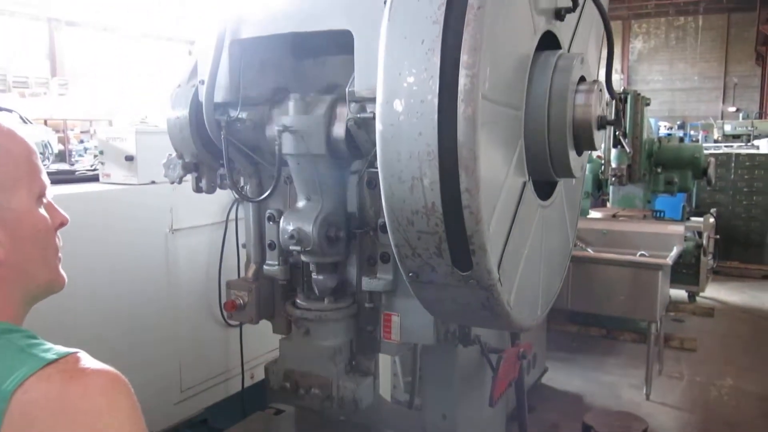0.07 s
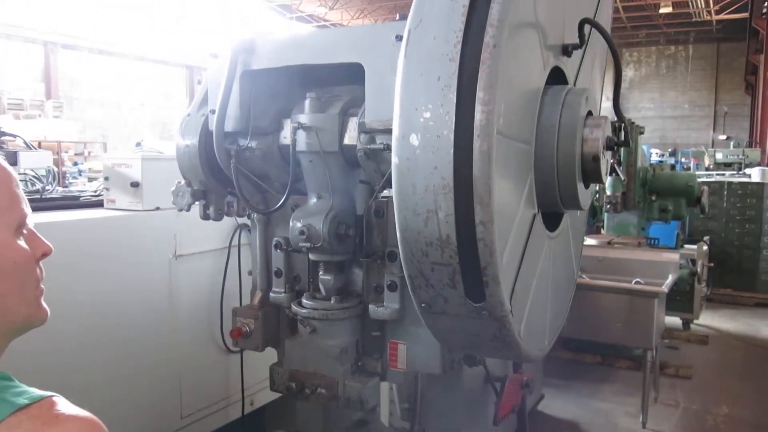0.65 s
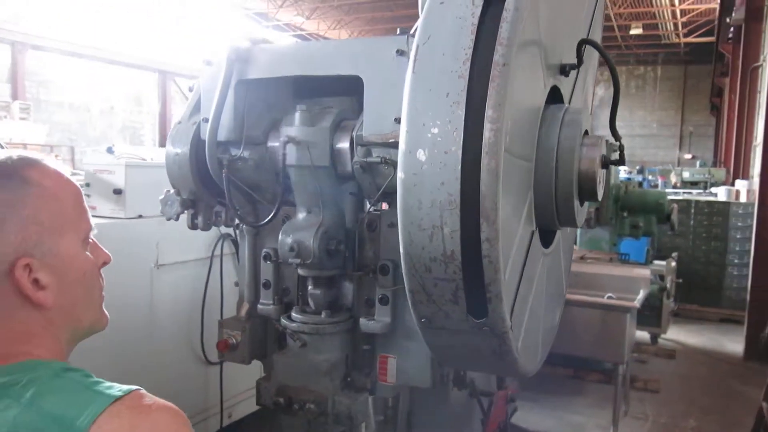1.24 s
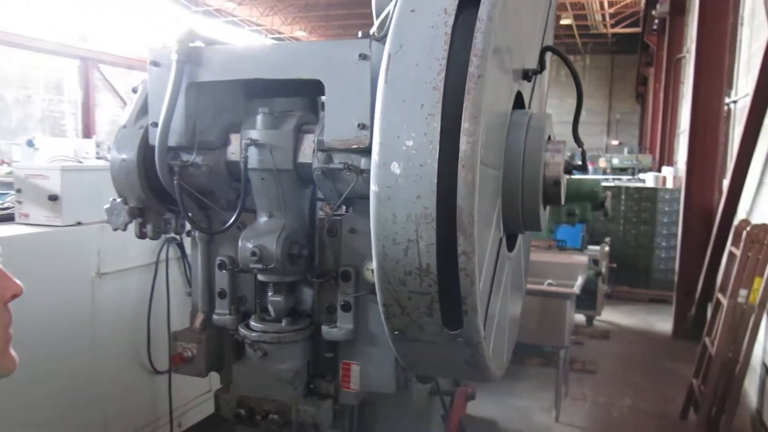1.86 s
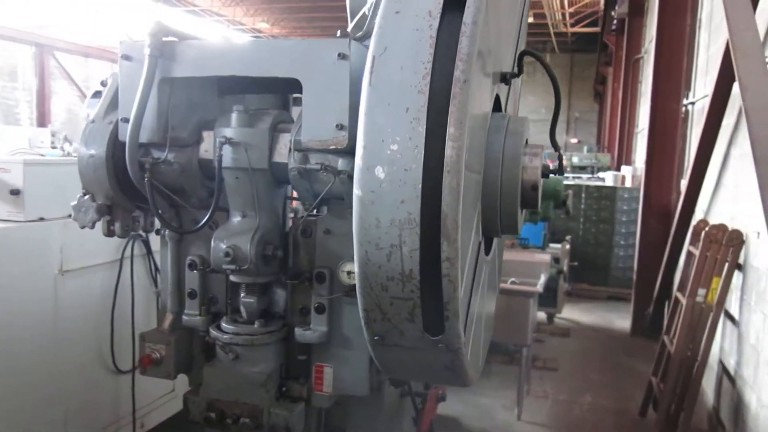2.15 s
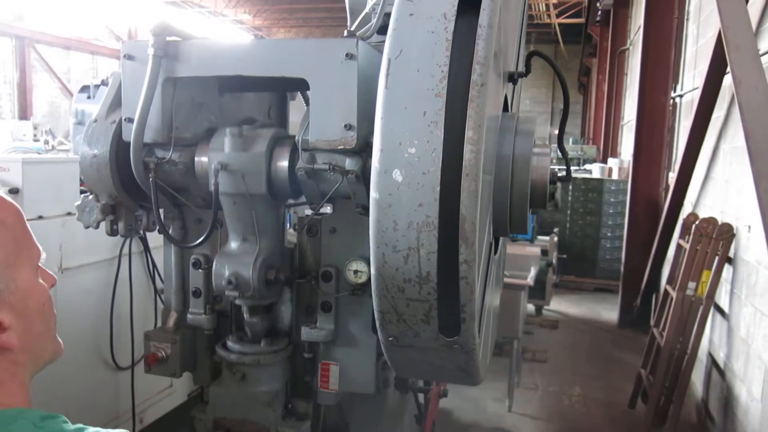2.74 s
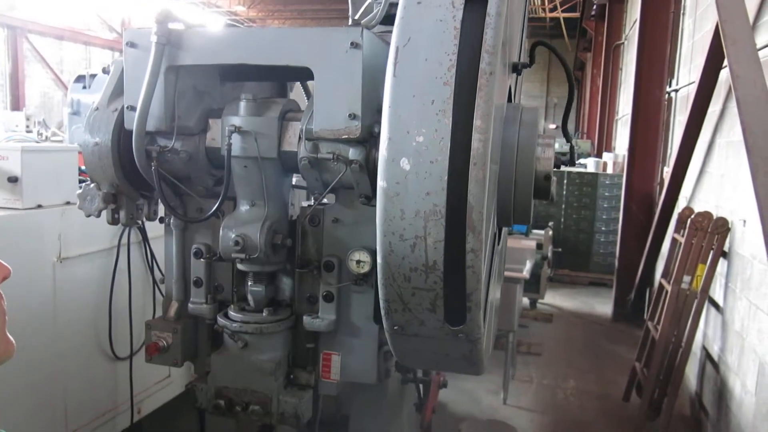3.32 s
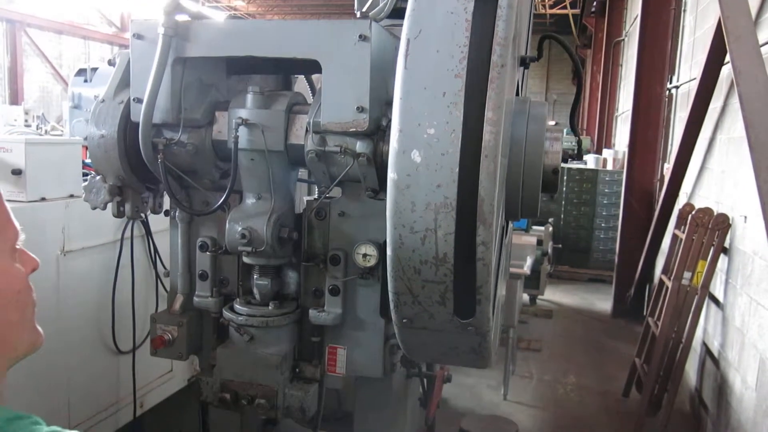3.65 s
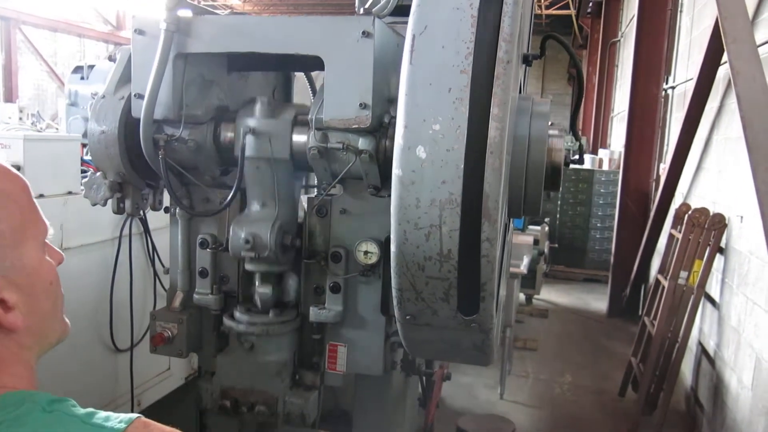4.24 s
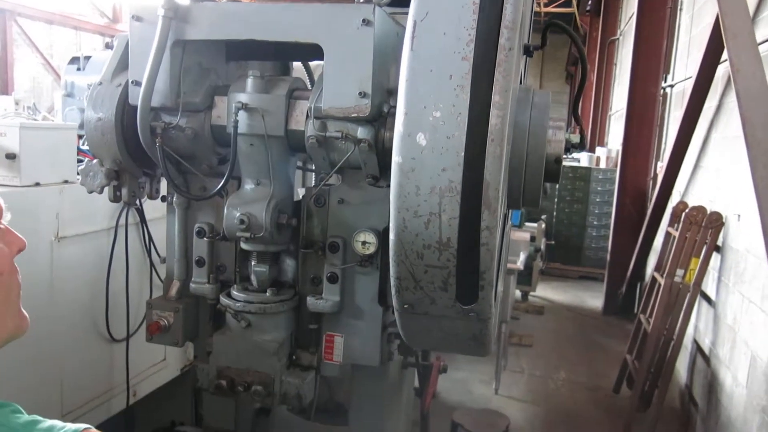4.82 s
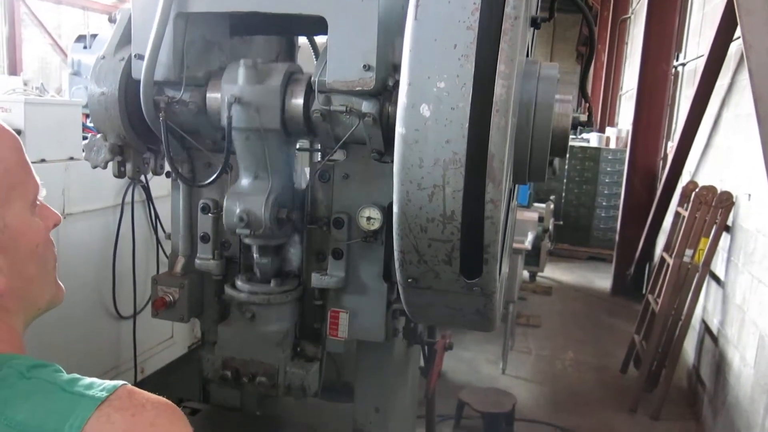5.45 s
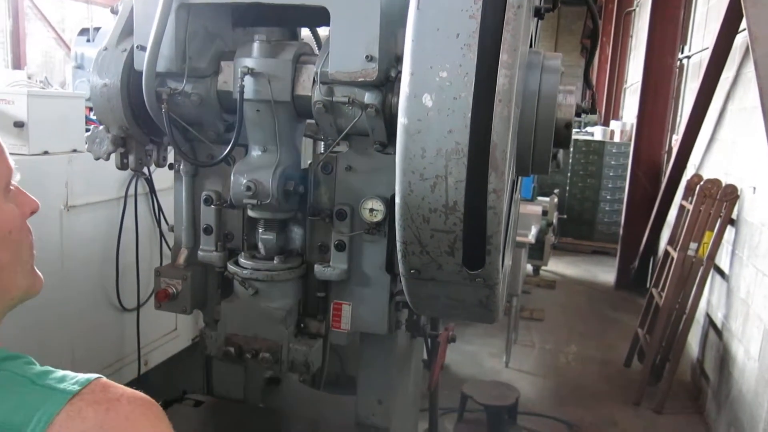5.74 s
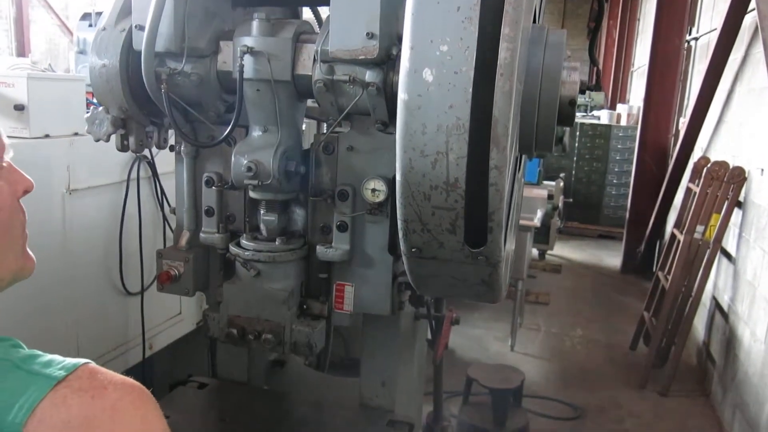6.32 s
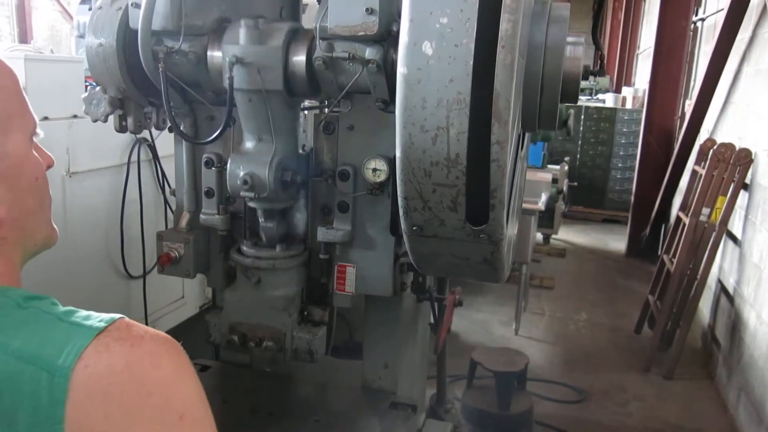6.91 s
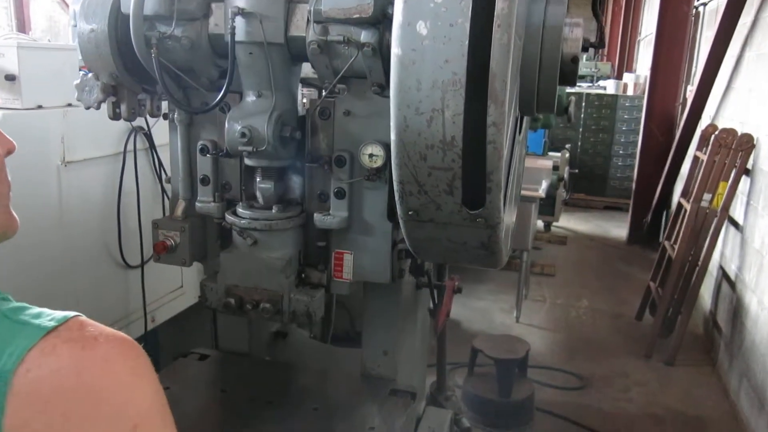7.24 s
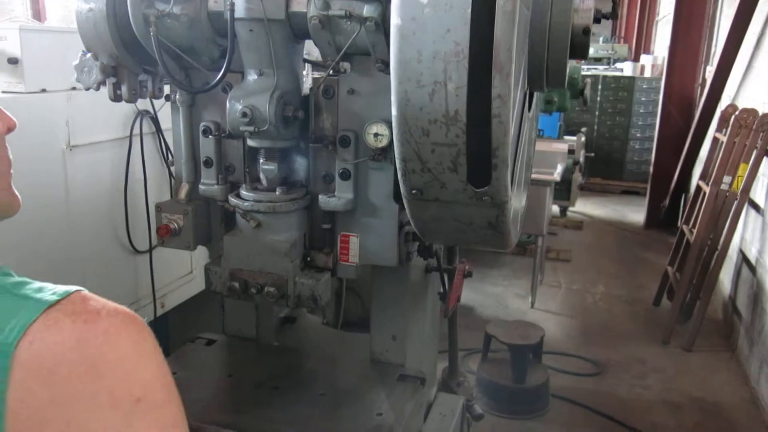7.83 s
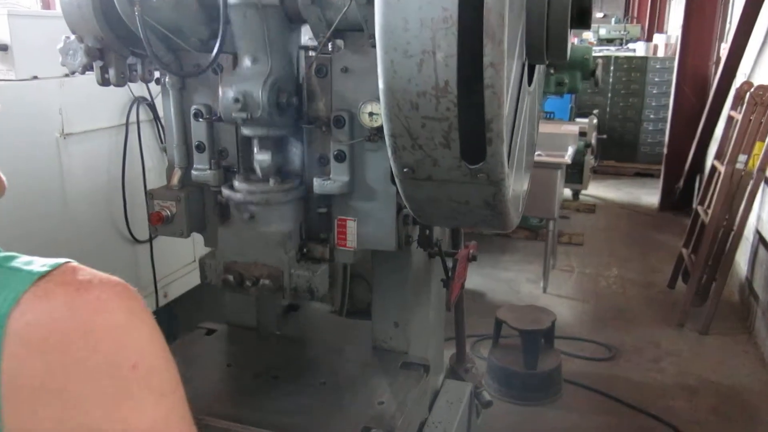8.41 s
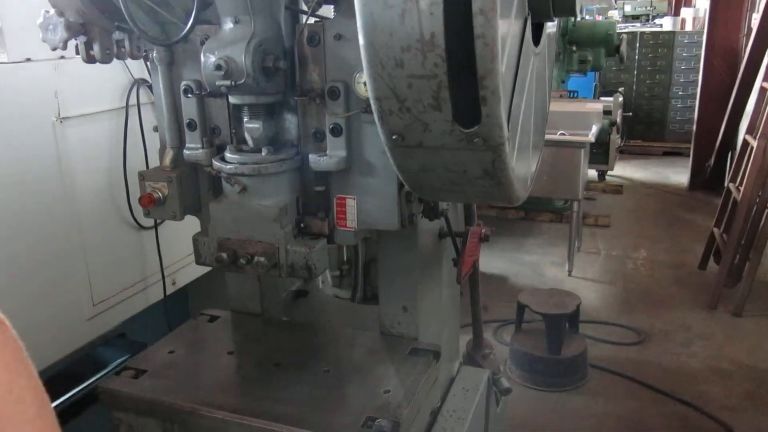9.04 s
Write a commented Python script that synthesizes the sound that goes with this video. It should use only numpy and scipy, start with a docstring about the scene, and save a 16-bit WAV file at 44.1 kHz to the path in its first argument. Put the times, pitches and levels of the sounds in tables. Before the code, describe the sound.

In a large, echoing workshop, a nearby punch press is tripped by its pedal over and over at a steady pace. Every stroke slams through the heavy metal frame, snaps sharply and ends in a ringing steel clank, seven in all. The pedal linkage clicks and clinks lightly between them, while the motor and flywheel keep up a soft, even hum.

```python
"""Heavy steel slams, clacks and clinks ring through a large workshop over a motor's hum.
A flywheel punch press is tripped by its pedal, one stroke at a time: the trip rod clicks, the clutch
slams in and shakes the cast frame, the latch snaps back, the clutch is knocked out in three quick
blows, and the pedal returns. Struck parts ring as decaying noise bands (crowded resonances)
and damped sines (single modes)."""
import sys
import numpy as np
from scipy import signal
from scipy.fft import rfft, irfft
from scipy.io import wavfile

SR = 44100
rng = np.random.default_rng(int(sys.argv[2]) if len(sys.argv) > 2 else 0)


def waveform_to_disk(signal):
    """Save audio, clipped to [-1, 1], as 16-bit WAV at the path in sys.argv[1]."""
    frames = np.transpose(np.atleast_2d(signal))
    scaled = np.clip(frames, -1, 1) * 32767
    samples = np.round(scaled).astype(np.int16)
    wavfile.write(sys.argv[1], SR, samples)


N = 399987
T = np.arange(N) / SR
RING_SAMPLES = 24576
BANDS_HZ = np.geomspace(50, 16000, num=16)
SNAP_AFTER_S, STOP_AFTER_S = .1515, .3826  # from the slam; same crank speed every stroke

# clutch engagements, one per stroke: start_s, level_db, boom_db, pin_slide_s, pin_sing_db
STROKES = [(-.106, 5, -0.5, .0255, -1), (1.2130, -0.5, -3.5, 0.024, -6), (2.6250, 0.5, 0, 0.026, -8),
           (3.9434, -1.5, 1, 0.024, -5.5), (5.3558, 0, -2, .026, -7), (6.768, 0, -1.5, 0.025, 0.5),
           (8.0864, -1, -2, .019, 4)]
# foot presses or leaves the pedal: start_s, level_db
TREADS = [(2.275, -13.5), (3.305, 6), (3.917, -1.5), (5.244, 1), (6.697, 6.5), (8.047, 3)]
# trip rod pulls the latch: start_s, click_db, ping_db
TRIPS = [(1.198, -9.5, -29.5), (2.566, 6, -6), (3.913, -14, -33), (5.2904, 4.5, 0), (6.7235, -0.5, -3.5),
         (8.076, -17, -29)]
# pedal let go, linkage springs back: start_s
RELEASES_S = [1.666, 3.2433, 4.4538, 5.8954, 7.2884, 8.6787]

# crowded resonances, cast frame: freq_hz, density_db, t60_s
FRAME_BODY = [(35, -18, 0.84), (80, -10, 0.52), (172, 0, 0.59), (320, -0.5, 0.61), (480, -3, 0.58),
              (650, 0.5, 0.26), (1280, -2, 0.39), (2610, -5.5, 0.17), (3140, -12, 0.33), (5000, -9.5, 0.11),
              (8950, -19.5, 0.19), (15360, -27, .11)]
# latch: freq_hz, density_db, t60_s
LATCH_BODY = [(100, -15.5, .2), (500, -2, 0.82), (1420, 3.5, 0.2), (2820, 6.5, 0.13), (2890, -3, 0.35),
              (4750, 6.5, 0.12), (5750, 0.5, 0.025), (9150, 3.5, 0.21), (11320, -1, 0.1),
              (14600, -1.5, .075), (15800, -1, .07)]
# clutch pin: freq_hz, density_db, t60_s
PIN_BODY = [(80.5, -3.5, 0.46), (300, -4.5, 0.27), (700, -1, 0.36), (2160, 1.5, 0.29), (3300, -5, 0.11),
            (4600, -1.5, 0.096), (8000, -9.5, .11), (15500, -12.5, 0.099)]
# pin stop: freq_hz, density_db, t60_s
STOP_BODY = [(80, -26, 0.27), (304, 5.5, 0.28), (650, 3.5, 0.24), (2150, 2, 0.13), (3180, -4.5, 0.19),
             (4700, -1, 0.15), (6200, -3.5, 0.14), (12300, -6.5, 0.15), (15500, -17, .09)]
# trip rod: freq_hz, density_db, t60_s
ROD_BODY = [(150, -16, 0.39), (500, -2.5, 0.23), (1500, -15, 0.22), (2110, -2, 0.077), (3060, -13.5, 0.11),
            (5100, -6, 0.1), (6800, -15, .08), (9000, -14, 0.12), (15500, -26, 0.068)]
# pedal linkage: freq_hz, density_db, t60_s
LINKAGE_BODY = [(150, -11, 0.2), (1400, 0.5, 0.2), (3370, -4.5, 0.16), (4240, 4, 0.2), (6650, -6.5, .13),
                (10000, -2.5, 0.23), (12600, -11.5, 0.16), (13800, 1, .12), (15800, -2, 0.067)]
# pedal: freq_hz, density_db, t60_s
PEDAL_BODY = [(80, -23, 0.28), (174, 7, 0.44), (450, 0.5, 0.13), (1000, 2, 0.2), (2020, -28, 0.28),
              (12000, -50, .1)]

# single modes, cast frame: pitch_hz, level_db, t60_s
FRAME_MODES = [(78.8, -26, 0.36), (103.6, -29.5, 1), (123.4, -26.5, 0.65), (150, -27, 1), (167, -21.5, 1),
               (237.6, -17, 0.17), (275, -16.5, 0.29), (320, -13.5, 0.68), (394.9, -16.5, 0.41),
               (602, -15.5, 0.58), (648, -9.5, 0.21), (723, -12, 0.13), (793, -19.5, 0.35),
               (1110, -31.5, 0.19), (1530, -19, 0.84), (3440, -35.5, .2), (3747, -28.5, .2),
               (4650, -21, .22), (7500, -15.5, 0.21), (9030, -24, .2), (10460, -22, 0.22)]
# downstroke squeak: pitch_hz, level_db, t60_s
SQUEAK_MODES = [(2600, -3, 0.074), (2766, -16, .08), (5200, -7, 0.043), (8240, -11.5, 0.045)]
# latch: pitch_hz, level_db, t60_s
LATCH_MODES = [(2420, -27, .2), (2690, -25, 0.31), (3700, -22.5, 0.2), (4820, -20.5, 0.24),
               (8920, -13, 0.075), (9100, -17, .07), (9970, -13, 0.081), (14000, -17, .07)]
# clutch pin: pitch_hz, level_db, t60_s
PIN_MODES = [(1550, 3.5, 0.86), (4760, -24, 1.1), (4900, -23, 0.83), (7490, -15, .9), (7150, -17, 1.4)]
# pin stop: pitch_hz, level_db, t60_s
STOP_MODES = [(675, -28, 0.25), (3220, -32, .12), (4620, -17, .12), (7510, -8.5, 0.062), (9300, -26, 0.12),
              (9630, -19, 0.078), (10350, -21, .065), (11900, -22, 0.081), (13800, -18.5, .07),
              (15229, -24, .11)]
# trip rod: pitch_hz, level_db, t60_s
ROD_MODES = [(175, -29, .4), (1918, -11, 0.046), (2110, -3.5, 0.035), (3795, -28.5, .16), (3870, -19, 0.21),
             (4900, -15.5, 0.12), (6110, -15, 0.044), (7440, -24, .09), (7600, -1, 0.054)]
# pedal linkage: pitch_hz, level_db, t60_s
LINKAGE_MODES = [(1490, -25, 0.99), (4350, -29, 0.11), (4840, -19, .4), (7530, -13, 0.33), (9200, 1, 0.074),
                 (14034, -22, .04), (14497, -15, .04)]

# hall reverberation: freq_hz, density_db, t60_s
HALL_DECAY = [(60, 3.5, 0.98), (170, 1, 2.25), (400, -2.5, 1.46), (1020, -1.5, 2.38), (1800, -0.5, 1.86),
              (3200, -3.5, 1.96), (4950, -0.5, 1.41), (8800, 0.5, 0.72), (15140, 7, 0.36)]
# fan, belt and flywheel noise: freq_hz, density_db
WHIRR_SPECTRUM = [(15, -50), (25, -5.5), (92, -16), (114, -3.5), (249, -14.5), (285, -2.5), (317, -13),
                  (394, -3.5), (476, -9), (531, -4), (840, -14), (1740, -12), (2220, -19), (16000, -40.5)]
# motor and bearing tones: pitch_hz, level_db
HUM_TONES = [(120, -68), (280, -71), (401, -68), (543.5, -61), (592, -71.5), (635, -66), (1045, -66)]


def clutch():
    """The pin slams into the flywheel, rebounds twice in its pocket and squeaks as the ram descends."""
    blows = pick(STROKES, column=1)
    slam = strike(blows, FRAME_BODY, db=-12.5, side_db=-3, change=.3, crack=1.04, rise_cycles=2.2)
    boom = chime(pick(STROKES, column=2), FRAME_MODES, db=-10.5, side_db=-1.5, split=.0032)
    rebounds = [(s + lag_s * rng.uniform(.88, 1.12), db) for s, db in blows for lag_s in (.012, .021)]
    rattle = strike(rebounds, FRAME_BODY, db=-21.5, side_db=-5.5, change=.87, crack=.99, rise_cycles=2.7)
    slams_s = blows[:, 0]
    since_s = T - slams_s[np.searchsorted(slams_s, T) - 1]
    frame = (slam + boom + rattle) * grip(since_s, hold_s=.08, over_s=.077, damping_db=3.5)
    squeaks = [(s + .128 + rng.uniform(-.0044, .003), db) for s, db in blows]
    return frame + chime(squeaks, SQUEAK_MODES, db=-29.5, side_db=-7, split=.01)


def grip(since_s, hold_s, over_s, damping_db):
    """The frame rings freely until the clutch takes the load; then friction damps it."""
    return undb(-damping_db * np.clip((since_s - hold_s) / over_s, 0, 1))


def latch():
    """A spring throws the latch against its seat, with equal force every stroke."""
    force_db = 3
    blows = [(s + SNAP_AFTER_S, force_db) for s, *_ in STROKES]
    snap = strike(blows, LATCH_BODY, db=-19.5, side_db=-3.5, change=.35, crack=.23, rise_cycles=4)
    return snap + chime(blows, LATCH_MODES, db=-13, side_db=-4, split=.006)


def knock_out():
    """The pin touches the latch, bounces once, rides up it, hits its stop and sings on."""
    force_db, bounce_s = -.41, .0107
    slam_s, _, _, slide_s, sing_db = np.transpose(STROKES)
    stop_s = slam_s + STOP_AFTER_S
    touches = [(s, force_db) for s in stop_s - slide_s]
    rides = [(s + bounce_s, db) for s, db in touches]
    stops = [(s, force_db) for s in stop_s]
    touch = strike(touches, PIN_BODY, db=-26.5, side_db=1, change=1, crack=2.1, rise_cycles=3.6)
    ride = strike(rides, PIN_BODY, db=-16, side_db=-3.5, change=.98, crack=.3, rise_cycles=4.4)
    stop = strike(stops, STOP_BODY, db=-12, side_db=-5, change=.52, crack=.95, rise_cycles=9.6)
    clang = chime(stops, STOP_MODES, db=-3, side_db=-1.5, split=.0038)
    sing = chime(zip(stop_s, sing_db), PIN_MODES, db=-39.5, side_db=4.5, split=.0018)
    return touch + ride + stop + clang + sing


def pedal():
    """Dull tread, click and ping of the trip rod, bright clink of the returning linkage."""
    pulls = pick(TRIPS, column=1)
    returns = [(s, 0) for s in RELEASES_S]
    tread = strike(TREADS, PEDAL_BODY, db=-34, side_db=-3.5, change=.58, crack=.1, rise_cycles=3.7)
    click = strike(pulls, ROD_BODY, db=-28, side_db=-3, change=.44, crack=.33, rise_cycles=4.9)
    ping = chime(pick(TRIPS, column=2), ROD_MODES, db=-14, side_db=-7, split=.0054)
    clink = strike(returns, LINKAGE_BODY, db=-22.5, side_db=-5.5, change=.14, crack=.52, rise_cycles=6.1)
    tinkle = chime(returns, LINKAGE_MODES, db=-24.5, side_db=-1, split=.0076)
    return tread + click + ping + clink + tinkle


def strike(blows, body, db, side_db, change, crack, rise_cycles):
    """Blows on a part's crowded resonances; change is the power share that varies with contact point."""
    out = np.zeros((2, N))
    bands = noise_bands(body, 2 * RING_SAMPLES)
    decay = band_envelopes(body, RING_SAMPLES, rise_cycles)
    common = np.sum(bands[..., :RING_SAMPLES] * decay, axis=0)
    contact = np.exp(-T[:RING_SAMPLES] / .0037)
    focus = np.array([1 + crack * contact, 1 - contact])  # direct onset: sharp, narrow
    for start_s, blow_db in blows:
        offset = rng.integers(RING_SAMPLES // 8, RING_SAMPLES)
        varied = np.sum(bands[..., offset:offset + RING_SAMPLES] * decay, axis=0)
        mid_side = np.sqrt(1 - change) * common + np.sqrt(change) * varied
        add(out, undb(db + blow_db) * stereo(mid_side * focus, side_db), start_s)
    return out


def chime(blows, modes, db, side_db, split):
    """A part's single modes swell as each blow spreads through it."""
    out = np.zeros((2, N))
    swell = 1 - np.exp(-T[:RING_SAMPLES] / .0028)
    for start_s, blow_db in blows:
        mid_side = ring(modes, scatter_db=-2, split=split) * swell
        add(out, undb(db + blow_db) * stereo(mid_side, side_db), start_s)
    return out


def ring(modes, scatter_db, split):
    """Three beating damped sines per mode; each blow shares its force among them differently."""
    out = np.zeros((2, RING_SAMPLES))
    for hz, db, t60_s in modes:
        t = T[:min(int(t60_s * SR), RING_SAMPLES)]
        spread = split * min(hz / 6000, 1)
        decay = np.exp(-np.log(1000) * t / t60_s)
        for offset in (-1, 0, 1):
            detune, force, width = rng.standard_normal(3)
            partial_hz = hz * (1 + spread * (offset + .5 * detune))
            partial = np.sin(2 * np.pi * partial_hz * t) * decay
            out[:, :len(t)] += undb(db + scatter_db * force) / 2 * np.outer([1, width], partial)
        out = -out  # adjacent modes in antiphase
    return out


def hall(dry, db, side_db, swell_s):
    """Echoes thicken as they return from walls and roof; treble dies first."""
    size = 3 * RING_SAMPLES
    bands = noise_bands(HALL_DECAY, size) * band_envelopes(HALL_DECAY, size, rise_cycles=.86)
    echoes = np.sum(bands, axis=0) * (1 - np.exp(-T[:size] / swell_s))
    response = stereo(echoes, side_db) / np.sqrt(np.sum(echoes[0] ** 2))
    return undb(db) * signal.fftconvolve(dry.mean(axis=0)[None], response, axes=1)[:, :N]


def motor():
    """Steady whirr of fan and flywheel; tones waver as the belt runs round."""
    whirr = stereo(noise(WHIRR_SPECTRUM, N), side_db=-3) * undb(-50.5 + .32 * wander(rate_hz=3))
    hum = np.zeros(N)
    for hz, db in HUM_TONES:
        amplitude = np.sqrt(2) * undb(db + 2.5 * wander(rate_hz=3.2))
        hum += amplitude * np.sin(2 * np.pi * hz * T + .45 * wander(rate_hz=11))
    return whirr + hum


def crackle(rate_hz, db, spread_db):
    """Faint, dry treble ticks at random times."""
    chance, strength = rng.random((2, N))
    ticks = (chance < rate_hz / SR) * undb(spread_db * np.minimum(-np.log(1 - strength), 4))
    bursts = signal.fftconvolve(ticks, np.exp(-T[:RING_SAMPLES // 16] / .0037))[:N]
    highpass = signal.butter(2, 8000, "high", fs=SR, output="sos")
    hiss = signal.sosfilt(highpass, rng.standard_normal((2, N)))
    return undb(db) * bursts * stereo(hiss, side_db=-14)


def noise(table, size):
    """Two independent noises with the table's spectrum, rms 1."""
    hz = np.fft.rfftfreq(size, 1 / SR)
    white = rfft(rng.standard_normal((2, size)))
    shaped = irfft(white * undb(lookup(table, hz, column=1)) * hz / (hz + 15), size)
    return shaped / shaped.std()


def noise_bands(table, size):
    """Shaped noise in roughly half-octave bands; axes: band, mid/side, time."""
    hz = np.fft.rfftfreq(size, 1 / SR)
    shares = np.array([np.interp(hz, BANDS_HZ, peak) for peak in np.eye(len(BANDS_HZ))])
    return irfft((rfft(noise(table, size)) * shares[:, None]).astype(np.complex64), size)


def band_envelopes(table, size, rise_cycles):
    """Each band builds over rise_cycles of its own period, then dies at its own rate."""
    t, hz = T[:size], BANDS_HZ[:, None, None]
    t60_s = lookup(table, hz, column=2)
    return (1 - np.exp(-t * hz / rise_cycles)) * np.exp(-np.log(1000) * t / t60_s)


def stereo(mid_side, side_db):
    """Mid/side to left/right; shorter waves differ more."""
    mid, side = mid_side
    bass, body = (signal.sosfilt(signal.butter(1, hz, fs=SR, output="sos"), side) for hz in (200, 6000))
    return mid + undb(side_db) * (1.17 * side - .5 * body - .5 * bass) * np.array([[1], [-1]])


def wander(rate_hz):
    """Slow random drift, spread near 1."""
    knots = rng.standard_normal(200)
    return np.interp(T * rate_hz, np.arange(len(knots)), knots)


def lookup(table, hz, column):
    """Table column interpolated over log frequency."""
    table = np.array(table)
    return np.interp(np.log(hz + 1e-9), np.log(table[:, 0]), table[:, column])


def pick(events, column):
    """Blows from an event table: start_s, level_db."""
    return np.array(events)[:, [0, column]]


def add(out, sound, start_s):
    """Mix in at start_s, cropped to the scene."""
    start = int(round(start_s * SR))
    lo, hi = max(start, 0), min(start + sound.shape[1], N)
    out[:, lo:hi] += sound[:, lo - start:hi - start]


def undb(db):
    """Decibels to gain."""
    return 10 ** (np.asarray(db) / 20)


def scene():
    """Close press, hall echo, idling motor, faint crackle."""
    press = clutch() + latch() + knock_out() + pedal()
    echo = hall(press, db=-12, side_db=-2.5, swell_s=.0053)
    return press + echo + motor() + crackle(rate_hz=18, db=-65, spread_db=5)


def record(dry):
    """Thin the deep bass, round the loudest peaks, cut the top."""
    low_hz, top_hz, ceiling = 55, 15800, 3.9
    thinned = signal.sosfilt(signal.butter(2, low_hz, "high", fs=SR, output="sos"), dry)
    rounded = ceiling * np.tanh(thinned / ceiling)
    return signal.sosfilt(signal.ellip(10, .2, 70, top_hz, fs=SR, output="sos"), rounded)


dry = scene()
out = record(dry)
waveform_to_disk(out)
```